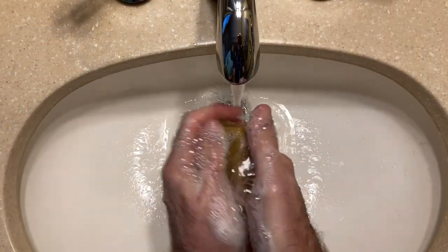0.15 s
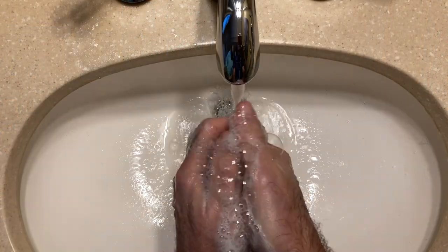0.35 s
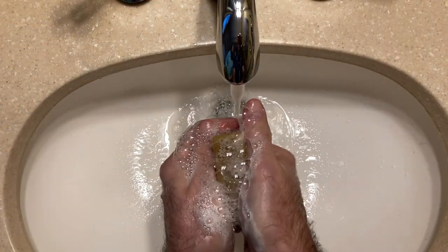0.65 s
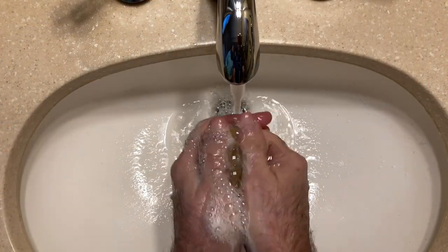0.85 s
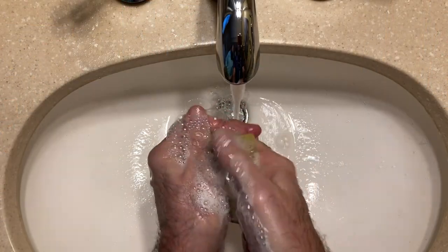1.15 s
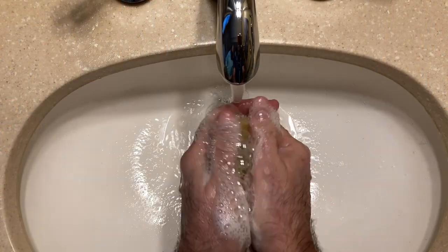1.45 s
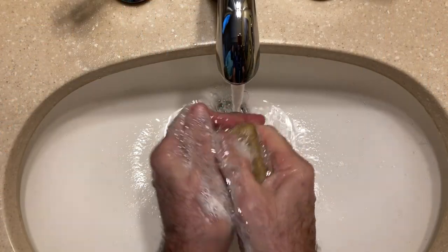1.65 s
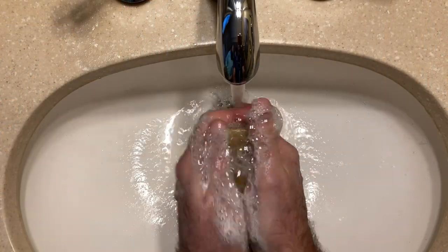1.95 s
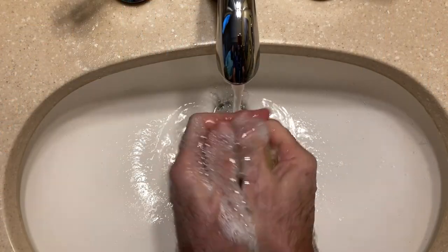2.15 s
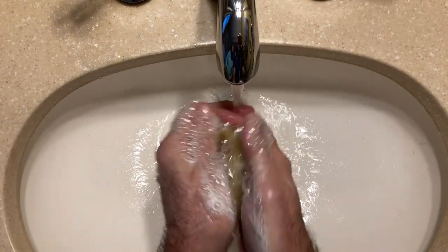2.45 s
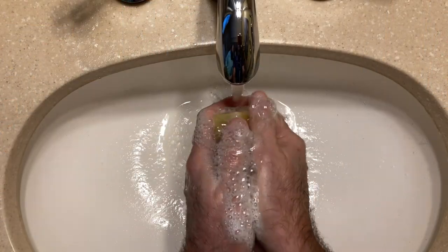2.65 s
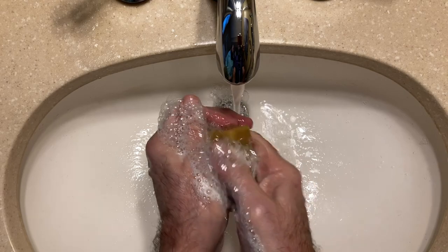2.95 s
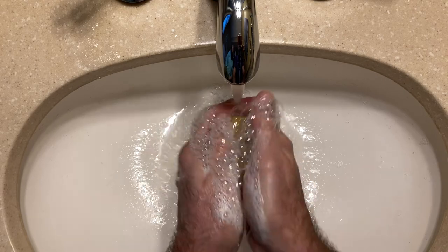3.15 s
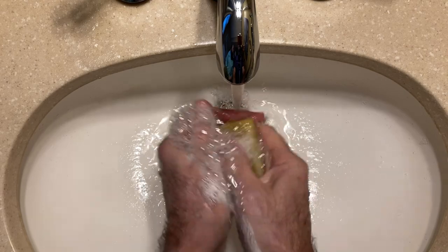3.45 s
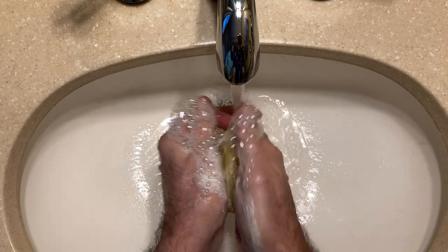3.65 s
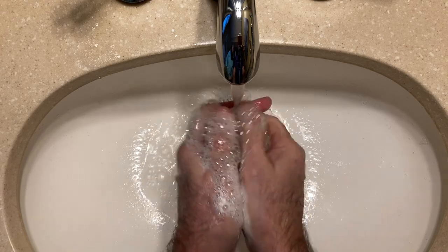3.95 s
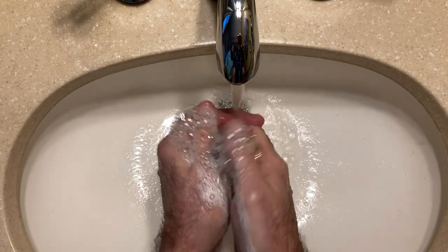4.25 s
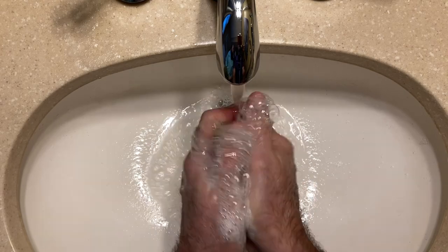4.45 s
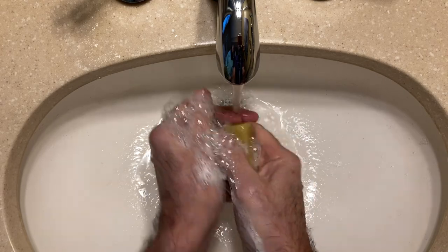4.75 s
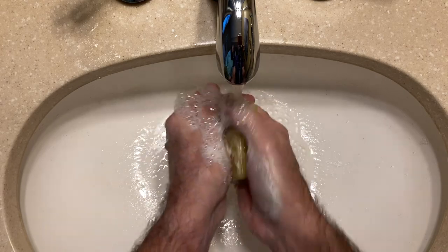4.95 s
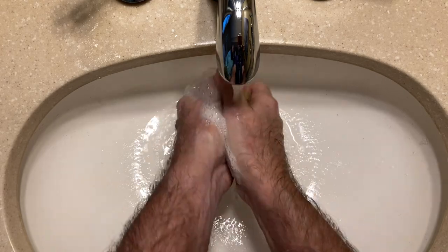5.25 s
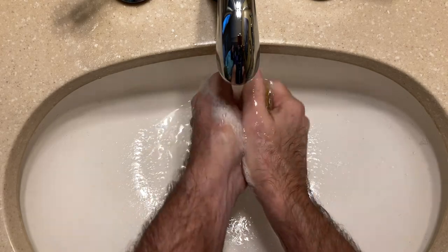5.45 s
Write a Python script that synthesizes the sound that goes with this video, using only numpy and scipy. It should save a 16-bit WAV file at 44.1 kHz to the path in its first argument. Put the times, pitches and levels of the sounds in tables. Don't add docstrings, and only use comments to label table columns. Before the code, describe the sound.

In a small bathroom, a faucet hisses quietly and steadily into a basin, with a faint fan hum. Very close, hands work soap: irregular squelchy strokes, fine fizz, sharp bubble snaps and wet pops, growing thicker in the middle. Around five seconds the lather fades quickly, leaving slightly quieter, duller water. Close mono microphone, short hard-basin reflections.

```python
import sys
import numpy as np
from scipy import signal
from scipy.fft import rfft, irfft, next_fast_len
from scipy.io import wavfile
from scipy.ndimage import uniform_filter1d, map_coordinates

SR = 44100
rng = np.random.default_rng(int(sys.argv[2]) if len(sys.argv) > 2 else 0)


def master_out(mix):
    frames = np.transpose(np.atleast_2d(mix))
    ceiling = np.clip(frames, -1, 1)
    pcm = np.round(ceiling * 32767).astype(np.int16)
    wavfile.write(sys.argv[1], SR, pcm)


def rack_gain(trim_db):
    fader = np.asarray(trim_db, float)
    return 10 ** (fader / 20)


N = 247401
RINSE_S = 5.0


def unit(x):
    return x / np.sqrt(np.mean(x ** 2) + 1e-20)


def shaped(x, points, modes=()):
    size = next_fast_len(N + 8192)
    hz = np.fft.rfftfreq(size, 1 / SR)
    point_hz, point_db = np.transpose(points)
    gain_db = np.interp(np.log(hz + 1), np.log(point_hz), point_db, left=-120, right=-120)
    for centre_hz, width_hz, peak_db in modes:
        gain_db += peak_db / (1 + ((hz - centre_hz) / width_hz) ** 2)
    return irfft(rfft(x, size) * rack_gain(gain_db), size)[..., :N]


def coloured(x, points, modes=()):
    return unit(shaped(x, points, modes))


def wobble(rate_hz):
    knots = rng.standard_normal(int(N * 60 / SR) + 4)
    return map_coordinates(knots, [np.arange(N) * rate_hz / SR])


def patchy(depth_db):
    z = signal.stft(rng.standard_normal(N), nperseg=256)[2]
    field = uniform_filter1d(rng.standard_normal(z.shape), size=8, axis=0)
    field = uniform_filter1d(field, size=4, axis=1)
    return signal.istft(z * rack_gain(depth_db * unit(field)), nperseg=256)[1][:N]


def bursts(rows, glide, size):
    _, peak_db, pitch_hz, cycles = (column[:, None] for column in np.transpose(rows)[:4])
    lives = np.arange(size) / SR * pitch_hz / np.maximum(cycles, .5)
    envelope = (np.e * 2.1 * lives * np.exp(-2.1 * lives)) ** 2
    return rack_gain(peak_db) * envelope * np.sin(2 * np.pi * cycles * lives * (1 + glide * lives))


def laid(rows, waves):
    start = np.round(np.asarray(rows)[:, :1] * SR).astype(int)
    at = start + np.arange(waves.shape[1])
    return np.bincount(at.ravel(), waves.ravel(), N + SR)[:N]


def stream_db():
    cupped_s, cupped_db_per_s = 4.2, 3
    return -59 - cupped_db_per_s * np.maximum(np.arange(N) / SR - cupped_s, 0)


# hz, level_db [dB per Hz]
STREAM_SPECTRUM = [(320, -46), (550, -13.5), (772, -2), (852, -2), (1300, 1), (2990, -12.5), (8600, -4.5),
                   (10500, -9.5), (13700, -7), (16000, -11)]
# pitch_hz, width_hz, gain_db
SPOUT_MODES = [(760, 35, 5.5), (993, 14, 6), (1298, 11.4, 7), (1640, 18, -1), (1710, 37, 4.5)]


def tap():
    muffle_db_per_s = 0.5
    level_db = stream_db() + 4.0 + 0.63 * wobble(4.42)
    stream = rack_gain(level_db) * coloured(patchy(1.8), STREAM_SPECTRUM, SPOUT_MODES)
    hiss = shaped(stream, [(2000, -30), (4000, 0), (20000, 0)])
    muffle = rack_gain(-muffle_db_per_s * np.maximum(np.arange(N) / SR - RINSE_S, 0))
    return stream - hiss * (1 - muffle)


# pitch_hz, level_db [rms]
FAN_TONES = [(59.2, -66), (500.6, -82.5)]
# hz, level_db [dB per Hz]
RUMBLE_SPECTRUM = [(28, 8), (45, -26), (80, -3), (100, -1), (165, -2), (195, -15.5), (250, -6.5),
                   (290, -13.5), (350, -7), (530, -13.5), (800, -14.5)]
# centre_s, half_length_s, sway_db
ARM_SWAYS = [
    (0.257, 0.37, -41.5),
    (1.55, 0.39, -38),
    (2.474, 0.2, -44.5),
    (3.472, 0.19, -39),
    (5.024, 0.37, -82),
]


def room():
    t = np.arange(N) / SR
    hum = np.zeros(N)
    for pitch_hz, level_db in FAN_TONES:
        level = np.sqrt(2) * rack_gain(level_db + 0.21 * wobble(3.9))
        hum += level * np.sin(2 * np.pi * pitch_hz * t + 0.16 * wobble(0.63))
    rumble = rack_gain(stream_db() - 8.0) * coloured(rng.standard_normal(N), RUMBLE_SPECTRUM)
    sway_spectrum = [(1.2, -5), (2.5, -4.5), (6, -14.5), (14, -36.0), (24, -71)]
    sway = coloured(rng.standard_normal(N), sway_spectrum)
    moving = rack_gain(-61.5)
    for centre_s, half_s, level_db in ARM_SWAYS:
        moving = moving + rack_gain(level_db) * np.exp(-((t - centre_s) / half_s) ** 4)
    return hum + rumble + moving * sway * np.minimum(t / 0.0095, 1)


# squelch_db, fizz_db
IDLE_FOAM_DB = [-63, -57.5]
# peak_s, rise_s, fall_s, squelch_db, fizz_db
PALM_STROKES = [(.3, 0.11, .15, -62.5, -55.5), (0.871, .06, 0.13, -66.5, -58.5), (1.3, 0.04, .1, -64, -54),
                (1.558, 0.076, .08, -58.5, -56.5), (1.718, 0.089, .1, -58, -51),
                (1.999, 0.1, .06, -60, -56), (2.249, 0.15, .16, -58, -49), (2.895, .045, 0.065, -47.5, -52),
                (3.048, 0.092, .15, -56.5, -51), (3.4, .08, 0.2, -55, -52), (3.598, 0.088, .15, -50, -54),
                (4.05, .08, .12, -56.5, -55), (4.26, .12, .15, -52, -53), (4.68, .08, 0.12, -53, -51),
                (4.86, 0.091, .09, -55, -58), (4.528, .1, .08, -60.5, -60), (5.255, 0.033, .04, -61, -55.5)]


def work():
    t = np.arange(0, N, 32) / SR
    rinse_db_per_s, thick_s = 30, 2.9
    build_db_per_s = [3.5, 0]
    level = rack_gain(IDLE_FOAM_DB)[:, None] * rack_gain(-rinse_db_per_s * np.maximum(t - RINSE_S, 0))
    level = level * rack_gain(-np.outer(build_db_per_s, np.maximum(thick_s - t, 0)))
    for peak_s, rise_s, fall_s, *stroke_db in PALM_STROKES:
        swell = np.exp(-((t - peak_s) / np.where(t < peak_s, rise_s, fall_s)) ** 2)
        level = np.hypot(level, rack_gain(stroke_db)[:, None] * swell)
    return np.array([np.interp(np.arange(N) / SR, t, row) for row in level])


def crackle(count, hz, spread, cycles, steep_db):
    pick = rng.random((count, 3))
    start_s = pick[:, 0] * N / SR
    peak_db = -steep_db * np.log(pick[:, 1] + .016)
    pitch_hz = np.clip(hz * np.exp(spread * rng.standard_normal(count)), 1500, SR / 3)
    rows = np.column_stack([start_s, peak_db, pitch_hz, cycles * (.5 + 1.5 * pick[:, 2])])
    return unit(laid(rows, bursts(rows, glide=0.18, size=256)))


# hz, level_db [dB per Hz]
SQUELCH_SPECTRUM = [(1600, -8), (2300, -8.5), (3000, -3.5), (5000, -1.5), (7000, -2.5), (9000, -69),
                    (12000, -22)]
# hz, level_db [dB per Hz]
FIZZ_SPECTRUM = [(2000, -65), (4000, -19), (6500, -11), (8600, -3), (10300, -11.5), (13600, -5.5),
                 (15200, -12), (16300, -60)]


def lather():
    wet, fine = np.hypot(work(), spray())
    clump = wobble(35)
    squelch = crackle(count=4500, hz=4200, spread=.4, cycles=5, steep_db=3.3) + .75 * patchy(4.2)
    fizz = 0.56 * crackle(count=5000, hz=10000, spread=0.392, cycles=3.6, steep_db=6.5)
    fizz += 0.65 * patchy(3.6)
    squelch_db = 1.6 * clump + wobble(11) - 0.5
    fizz_db = 0.27 * clump + 1.4 * wobble(15.0) - 0.5
    squelch = wet * rack_gain(squelch_db) * coloured(squelch, SQUELCH_SPECTRUM)
    return squelch + fine * rack_gain(fizz_db) * coloured(fizz, FIZZ_SPECTRUM)


def lesser(count, effort, over_db, hz, spread):
    pick = rng.random((count, 3))
    share = np.cumsum(effort) / effort.sum()
    at = np.searchsorted(share, (np.arange(count) + pick[:, 0]) / count)
    at = np.minimum(at, N - 1)
    peak_db = 20 * np.log10(effort[at]) + over_db - 8 * pick[:, 1]
    pitch_hz = np.clip(hz * np.exp(spread * (2 * pick[:, 2] - 1)), 1500, SR / 3)
    return np.column_stack([at / SR, peak_db, pitch_hz])


# delay_s, spread_s, level_db
WALL_ECHOES = [(.0042, .0006, -23), (.0087, .001, -29)]


def basin(waves, palm, echo_db, tail_db, t60_s):
    size = 3072
    t = np.arange(size) / SR
    swell = rack_gain(tail_db - 60 * t / t60_s) * np.minimum(t / 0.00027, 1)
    for delay_s, spread_s, wall_db in WALL_ECHOES:
        swell = swell + rack_gain(echo_db + wall_db) * np.exp(-((t - delay_s) / spread_s) ** 2)
    answer = swell * rng.standard_normal((len(waves), size))
    answer[:, 0] = 1
    answer[:, round(.00122 * SR)] += palm
    return signal.fftconvolve(waves, answer, axes=1)


# start_s, peak_db, pitch_hz
SMALL_FILMS = [(0.0405, -28, 8000), (0.2349, -29.5, 9000), (0.286, -27.5, 8500), (0.418, -31, 8950),
               (0.5082, -22.5, 9200), (0.559, -31, 9150), (0.8113, -22, 10500), (0.8325, -32, 8150),
               (0.8615, -27, 10700), (0.9402, -28, 10000), (0.973, -29, 9050), (1.1526, -28.5, 8850),
               (1.3122, -25.5, 10100), (1.5432, -23.5, 8500), (1.5923, -26.5, 8700), (1.6662, -25.5, 9220),
               (1.7414, -23.5, 8300), (1.7751, -26, 8500), (1.808, -28, 8600), (2.253, -19.5, 7750),
               (2.302, -28, 7870), (2.3714, -24, 8300), (2.4473, -25, 8550), (2.8669, -26, 7440),
               (2.9312, -24, 8950), (3.3567, -28.5, 8200), (3.6036, -27, 8800), (4.1935, -25, 7950),
               (4.874, -24, 9500), (4.923, -27.5, 9500),
               (0.4357, -25, 11900), (1.33, -32, 12900), (1.962, -22, 11900), (1.9974, -31, 13200),
              (2.0093, -26, 12300), (2.048, -28.5, 13000), (2.1262, -26, 11400), (2.1442, -26, 12140),
              (2.1855, -20, 13300), (2.2094, -13.5, 13600), (2.232, -20.5, 13600), (2.2807, -24, 13800),
              (2.259, -20, 13600), (2.3082, -24, 13600), (2.358, -28, 13600), (2.4349, -25, 12000),
              (0.488, -30, 13000), (0.7532, -30, 13600), (0.7896, -28, 12000), (3.0425, -28, 13700),
              (3.554, -18.5, 12500), (4.784, -27, 13700), (4.835, -41, 13000), (4.9501, -35, 9500),
              (5.002, -34, 8050), (5.04, -36, 7000), (5.094, -33, 6900), (5.259, -32, 7000),
              (5.272, -36, 7500), (5.113, -32, 12400)]
# pitch_hz, width_hz, gain_db
PORT_MODES = [(8620, 500, 9), (13600, 1000, 2.5), (10200, 350, -2.5)]


def ticks():
    fizz = work()[1]
    rows = np.vstack([SMALL_FILMS,
                      lesser(count=80, effort=fizz, over_db=6.5, hz=9500, spread=0.27),
                      lesser(count=8, effort=fizz, over_db=26, hz=13000, spread=0.053)])
    rows = np.column_stack([rows, np.full(len(rows), 1.8)])
    snaps = rack_gain(-5.5) * bursts(rows, glide=0.0094, size=64)
    answered = laid(rows, basin(snaps, .4, echo_db=1, tail_db=-23, t60_s=.022))
    return shaped(answered, [(1500, -18), (5000, -2.0), (20000, 5.0)], PORT_MODES)


# start_s, peak_db, pitch_hz, cycles, palm_gain
LARGE_FILMS = [(0.2358, -33, 5970, 0.72, 0.96), (0.2854, -33, 5960, 4.3, 1), (1.246, -19.5, 4270, 0.76, 1),
               (1.295, -34, 5660, 1.5, 0.63), (1.543, -36, 6260, 3.3, 0.98), (1.5704, -29, 5400, 3.4, 0.31),
               (1.8817, -19, 2320, 1.33, 0.14), (2.0853, -23.5, 5700, 1.4, 0.62),
               (2.185, -27, 7060, 4.5, 1), (2.212, -34, 5670, 5.6, 0.72), (2.371, -33, 4330, 2.4, 0.45),
               (2.5445, -15.5, 4630, 1.17, 1), (2.5937, -28.5, 5100, 2.1, 0.96),
               (2.8626, -27, 5530, 0.87, 1), (2.8842, -24.5, 4860, 1.1, 0.29),
               (2.895, -24.5, 4300, 1.3, 0.45), (2.9332, -26, 6100, 1.5, 0.56),
               (3.153, -24, 2160, 1.6, 0.091), (3.349, -31, 5870, 1.5, 0.95),
               (4.008, -31.5, 5290, 3.7, 0.38), (4.2757, -29.5, 4300, 1.7, 0.95),
               (4.455, -27.5, 3600, 1.5, 0.18), (4.654, -37, 6100, 1.9, 0.47),
               (3.3077, -31, 5200, 1.5, 0.38)]
# start_s, peak_db, pitch_hz, cycles
AIR_POCKETS = [(0.448, -32.5, 1420, 0.93), (1.197, -39.5, 1920, 6.3), (1.381, -43.5, 2500, 3.7),
               (1.5096, -32.5, 3600, 2.4), (1.6577, -27.5, 3570, 4.1), (1.7095, -32, 3850, 1.8),
               (1.806, -42, 4200, 3.7), (2.2298, -35, 3760, 7.2), (2.253, -25.5, 3860, 6.6),
               (2.3268, -30, 2800, 3.8), (2.4354, -42, 3870, 5.6), (2.6942, -34.5, 3400, 1.5),
               (2.7736, -35.5, 3800, 7.7), (2.8065, -36, 3520, 3.8), (2.909, -28.5, 3000, 3.7),
               (3.0041, -38, 2950, 8.5), (3.0634, -37.5, 3200, 8.5), (3.449, -37.5, 1440, 6.2),
               (3.559, -34.5, 2920, 6.4), (3.6051, -21, 3180, 5.1), (3.655, -37, 3180, 4.6),
               (3.7, -38, 4620, 4.3), (3.888, -34.5, 3330, 2.3), (3.921, -32.5, 3670, 3.5),
               (4.078, -33, 4430, 5.1), (4.1672, -31.5, 5100, 3.7), (4.2305, -25, 3430, 2.8),
               (4.327, -38.5, 2700, 8.9), (4.4084, -38, 2000, 4.3), (5.4827, -35, 2360, 4.2)]


def pops():
    squelch = work()[0]
    chance = lesser(count=36, effort=squelch, over_db=18, hz=5200, spread=0.1)
    chance = np.column_stack([chance, np.full(36, 2.7)])
    rows = np.vstack([np.array(LARGE_FILMS)[:, :4], AIR_POCKETS, chance])
    palm = np.append(np.transpose(LARGE_FILMS)[4], np.full(len(rows) - len(LARGE_FILMS), 0.22))
    waves = rack_gain(.5) * bursts(rows, glide=0.0067, size=256)
    ring_db = -10 * np.log10(np.maximum(rows[:, 3:], 1))
    answered = basin(waves, palm, echo_db=ring_db - 6, tail_db=ring_db - 29.5, t60_s=.08)
    return shaped(laid(rows, answered), [(300, -56), (900, -3), (1500, -3.0), (20000, -3.0)])


def spray():
    decay_s, under_peak_db = 0.017, [-23.5, -31.5]
    rows = np.array([row[:2] for row in LARGE_FILMS + AIR_POCKETS])
    dying = rack_gain(rows[:, 1:]) * np.exp(-np.arange(4096) / SR / decay_s)
    return rack_gain(under_peak_db)[:, None] * laid(rows, dying)


# start_s, peak_db, pitch_hz, cycles
SOFT_BUMPS = [
    (0.44, -54, 650, 3.8),
    (0.735, -56.5, 314, 3.2),
    (1.375, -36, 13, 0.61),
    (3.61, -52, 660, 4.1),
    (5.572, -51.5, 2250, 5.5),
    (5.583, -53, 2000, 5.5),
    (5.581, -51.5, 330, 3.4),
]


def knocks():
    return laid(SOFT_BUMPS, bursts(SOFT_BUMPS, glide=0.018, size=16384))


def scene():
    return (tap() + room() + lather() + ticks() + pops() + knocks())[None]


def top_cut(x):
    return signal.sosfilt(signal.butter(12, 16040, fs=SR, output="sos"), x)


def record(dry):
    top_hz = 15750
    kept = shaped(dry, [(.5, 0), (top_hz, 0)])
    return top_cut(kept)


dry = scene()
out = record(dry)
master_out(out)
```